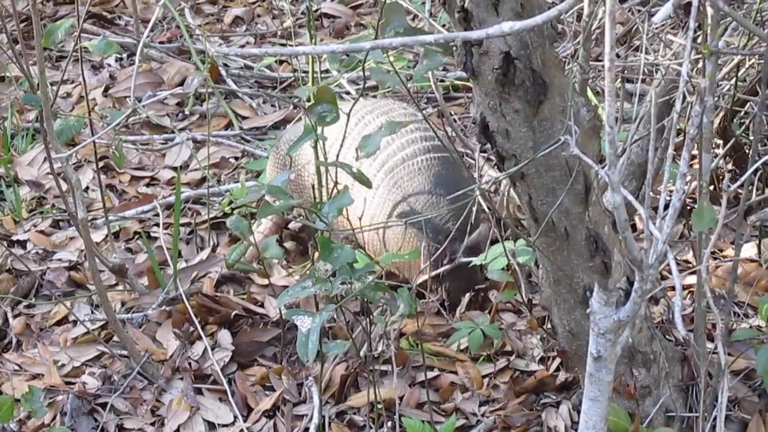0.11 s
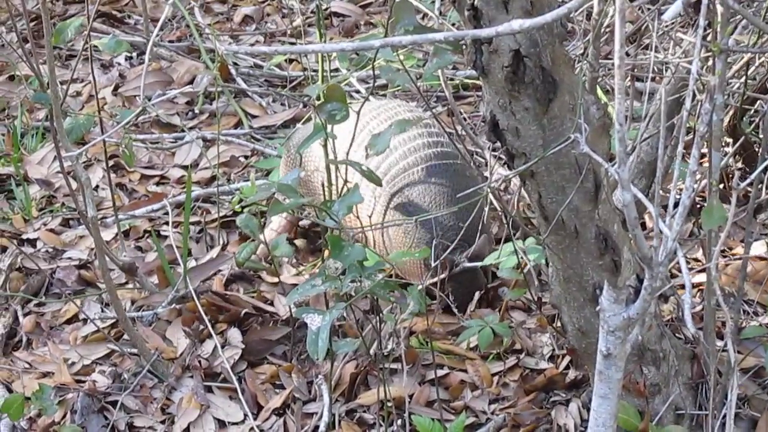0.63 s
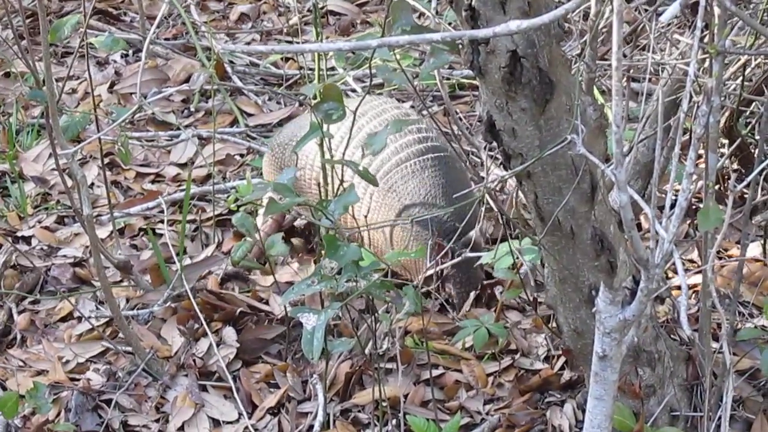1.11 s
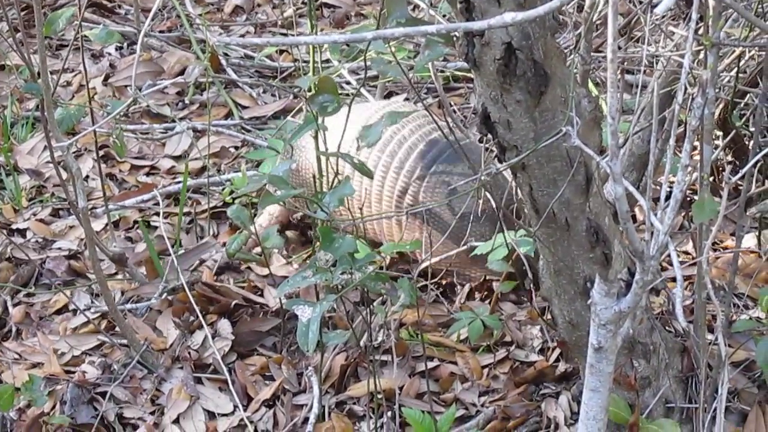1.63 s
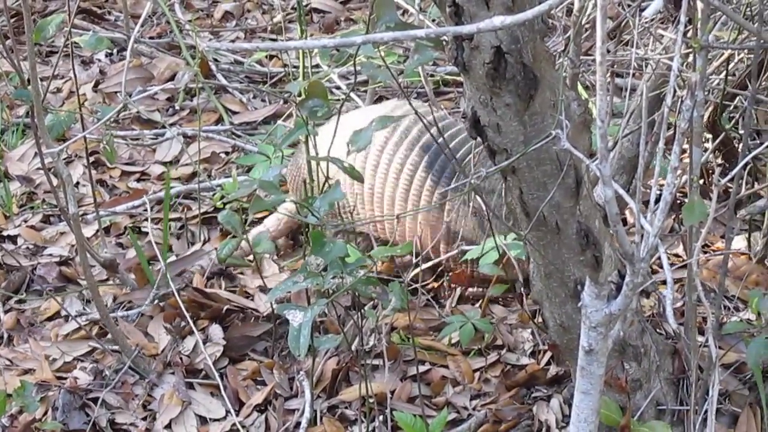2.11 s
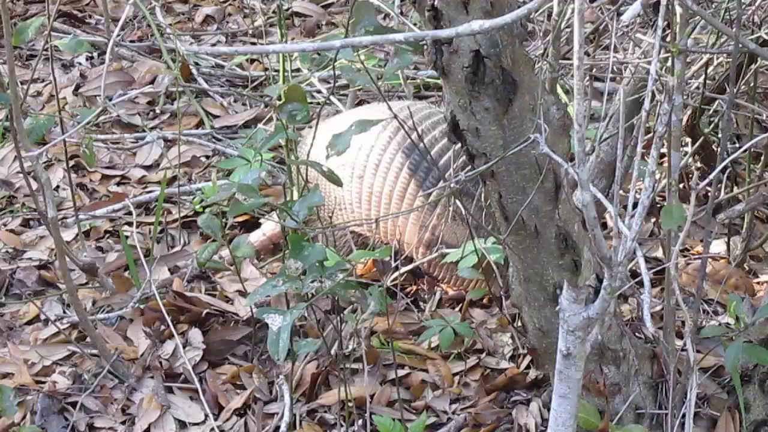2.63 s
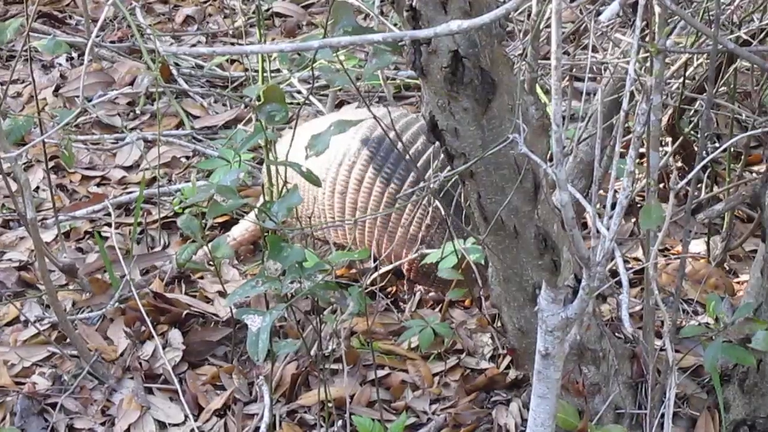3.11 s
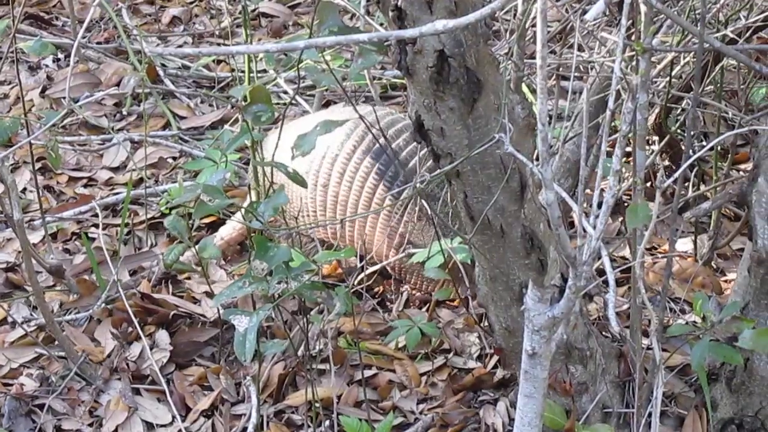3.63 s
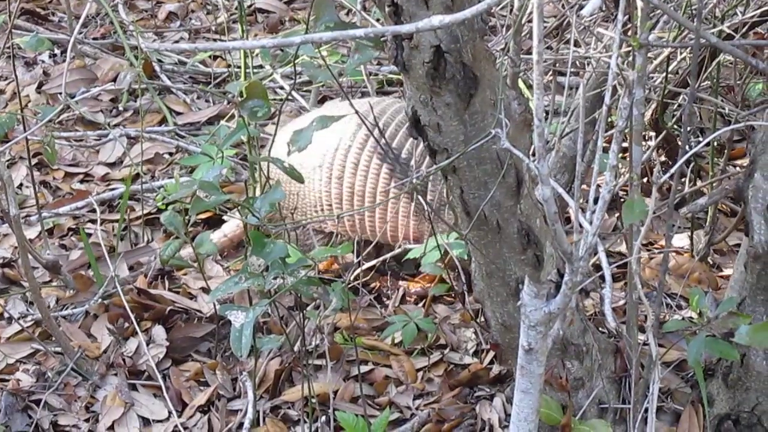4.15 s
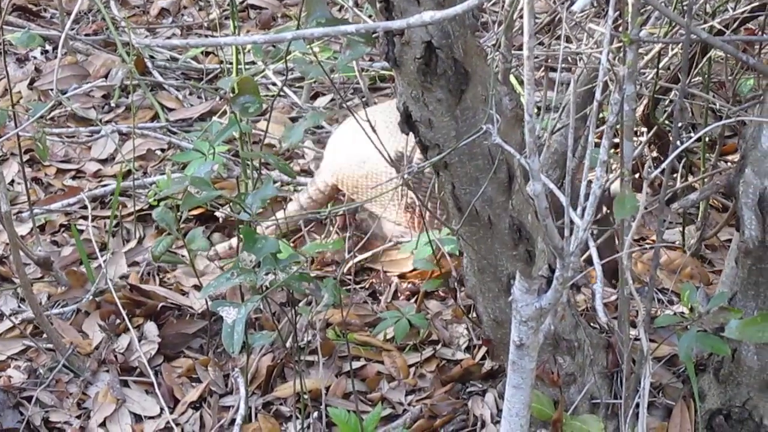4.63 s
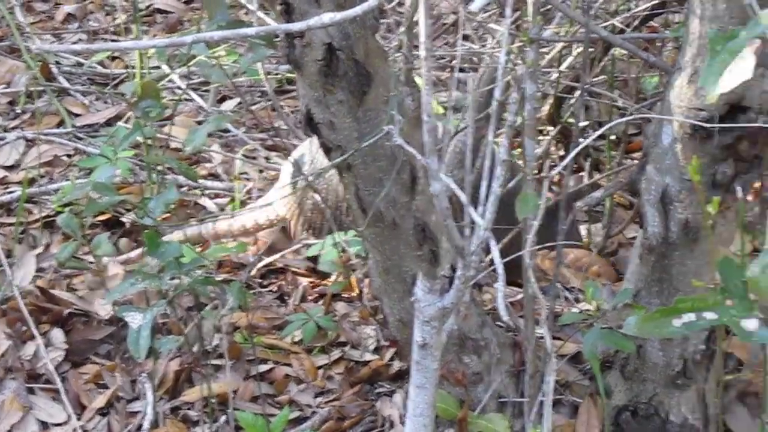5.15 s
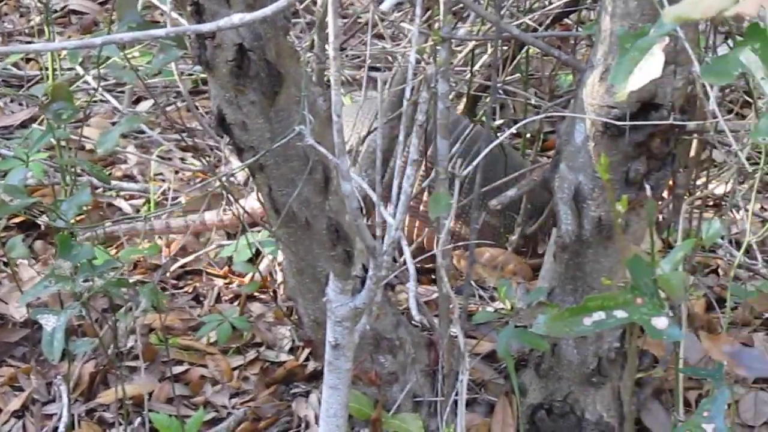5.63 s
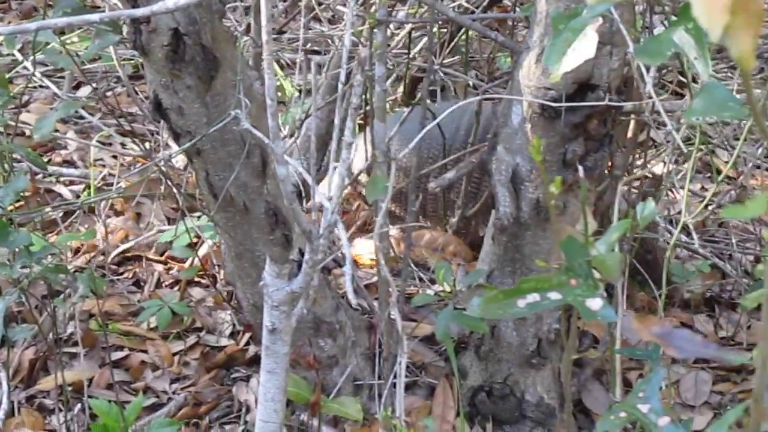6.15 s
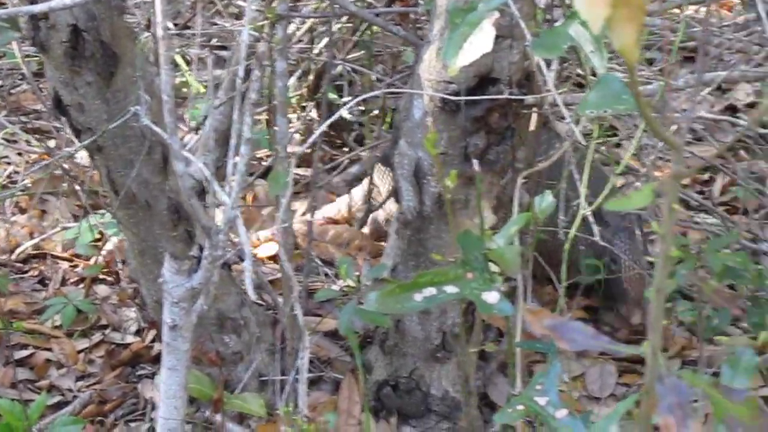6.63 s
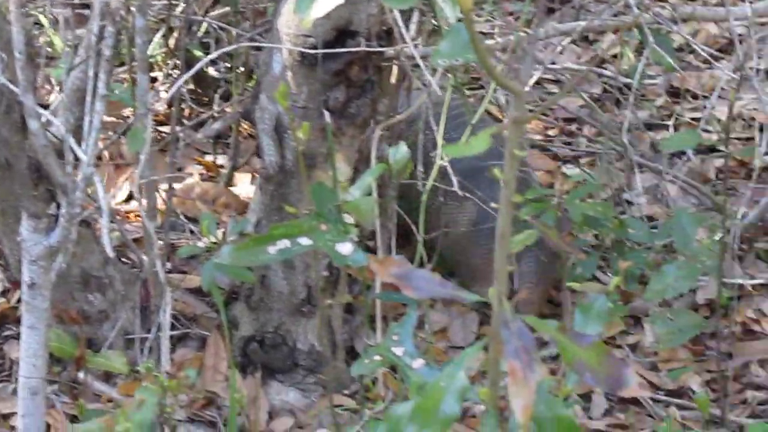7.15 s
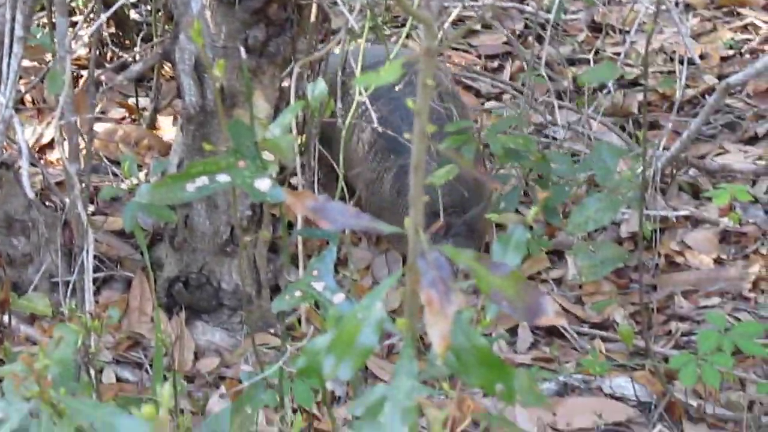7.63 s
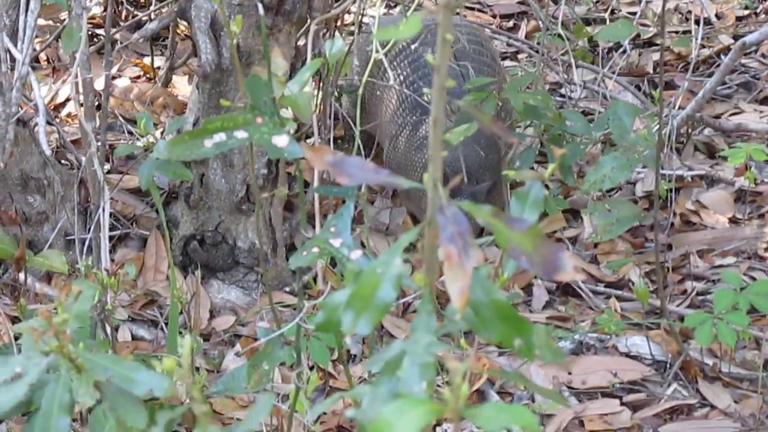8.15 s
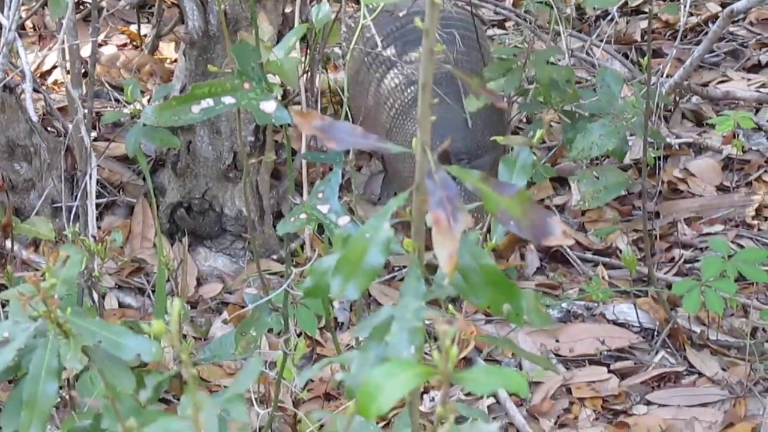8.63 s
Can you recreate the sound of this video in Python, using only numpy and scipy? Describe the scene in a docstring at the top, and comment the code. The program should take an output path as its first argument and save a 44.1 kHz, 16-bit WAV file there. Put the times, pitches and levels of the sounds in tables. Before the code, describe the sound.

Dry leaf litter crackles in uneven bursts, sparse then busy with sharp snaps, above a quiet woodland hush, insect hiss and far-off traffic rumble.

```python
"""In a thicket, an armadillo noses and shuffles through dry leaves a few metres from a small stereo camera.
The rustle is a swarm of tiny noise flashes that swells with each push; single leaves and twigs snap
as short noise bursts with a ring and a thud. Insects far off are a band of noise, with one nearer
throbbing singer; distant traffic is a wavering sine drone, a growl and a rumble, under the hush of the wood."""
import sys
import numpy as np
from scipy import signal
from scipy.fft import rfft, irfft, next_fast_len
from scipy.io import wavfile
from scipy.ndimage import uniform_filter1d

SR = 44100
rng = np.random.default_rng(int(sys.argv[2]) if len(sys.argv) > 2 else 0)


def store_pcm(level_fs):
    """Save levels as 16-bit WAV."""
    pcm = np.round(np.clip(level_fs, -1, 1) * 32767).astype(np.int16)
    wavfile.write(sys.argv[1], SR, np.atleast_2d(pcm).T)


def gain_from_decibels(decibels):
    """Convert decibel values to linear amplitude factors."""
    exponent = np.asarray(decibels, float) / 20
    return 10 ** exponent


N = 386793
T = np.arange(N) / SR
RUSTLE_PIVOT_DB = -53.5  # rustle level around which the dull crunch and the lesser cracks scale


def shape(x, points):
    """Filter by (Hz, dB) points joined on a log-frequency axis."""
    hz, db = np.transpose(points)
    size = next_fast_len(x.shape[-1])
    f = np.maximum(np.fft.rfftfreq(size, 1 / SR), 1)
    gain_db = np.interp(np.log(f), np.log(np.maximum(hz, 1)), db)
    return irfft(rfft(x, size) * gain_from_decibels(gain_db), size)[..., :x.shape[-1]]


def band(x, lo_hz, hi_hz):
    """Butterworth band-pass."""
    return signal.sosfilt(signal.butter(3, [lo_hz, min(hi_hz, .48 * SR)], "band", fs=SR, output="sos"), x)


def unit(x):
    """Scale to rms 1."""
    return x / np.sqrt(np.mean(x ** 2))


def curves(table):
    """Columns of a table after its time column, one value per sample."""
    s, *columns = np.transpose(table)
    return [np.interp(T, s, c) for c in columns]


def walk(rate_hz):
    """Random levels held for 1 / rate_hz seconds, smoothed twice, scaled to rms 1."""
    hold = int(SR / rate_hz)
    steps = np.repeat(rng.standard_normal(N // 200), hold)[:N]
    return unit(uniform_filter1d(uniform_filter1d(steps, hold), hold))


def fade(x, t60_s):
    """Each impulse dies away by 60 dB in t60_s."""
    return signal.lfilter([1], [1, -np.exp(-np.log(1000) / (t60_s * SR))], x)


def wide(points):
    """Stereo noise: one shared part, and an opposed side part coloured by points."""
    mid, side = rng.standard_normal((2, N))
    return mid + shape(side, points) * np.array([[1], [-1]])


# each shove of snout or foot: peak_s, rustle_db, fall_ms (6 dB down on either side), crisp_db (over rustle)
SHOVES = [(0.034, -55.5, 39, 8), (0.165, -58, 31, 3), (0.442, -61, 23, -1.0), (0.537, -65, 52, 5),
          (0.692, -68, 99, 4), (1.0, -61.5, 97, 4), (1.123, -60, 34, 7), (1.273, -67, 30, 13),
          (1.349, -61.9, 24, 10), (1.505, -54, 20, 3.5), (1.611, -53, 33, 4.3), (1.69, -58, 50, 5),
          (1.857, -48.5, 42, 5.5), (2.013, -46.0, 44, 4.5), (2.094, -47.5, 32, 5), (2.266, -47, 65, 3.5),
          (2.486, -53, 18, 3.1), (2.588, -54.5, 27, 3), (2.757, -72, 15, -7), (2.889, -61.5, 81, 4.5),
          (3.047, -66, 23, 7), (3.288, -61.5, 82, 1.5), (3.44, -64, 74, 2), (3.577, -65, 19, 3),
          (3.634, -65, 28, 1), (3.854, -67, 36, 5), (4.158, -57.5, 107, 5), (4.302, -49.5, 16.5, 4.5),
          (4.428, -54, 96, 8), (4.679, -49, 112, 6.5), (4.696, -46.5, 33, 3), (4.787, -60, 14, 4),
          (5.083, -54, 17, -2.6), (5.237, -53.5, 21, 5), (5.34, -60, 33, 3), (5.448, -48, 138, 4),
          (5.62, -54, 35, 1), (5.767, -49, 138, 3.7), (5.858, -49, 87, 7.5), (6.011, -55, 35, 3.3),
          (6.15, -50.5, 17, 6), (6.233, -45, 19, 7.5), (6.263, -48, 151, 3), (6.45, -44, 18, 3),
          (6.55, -52.5, 50, -6), (6.671, -44, 17, -5), (6.805, -39.5, 63, 2.2), (6.94, -46, 62, 3.5),
          (7.033, -41.5, 39, 1.5), (7.123, -42, 23, 3), (7.23, -56, 28, 1), (7.282, -42, 38, 0),
          (7.35, -50, 27, 4), (7.41, -46.0, 66, 3.5), (7.49, -51, 36, 0), (7.556, -51.5, 34, 7.5),
          (7.647, -52, 22, 6), (7.7, -56, 30, 2), (7.811, -52, 39, 4.5), (7.964, -48.5, 40, 4.5),
          (8.06, -55, 30, 1), (8.135, -55.5, 25, 5.5), (8.21, -53.5, 18, 6), (8.39, -51, 20, 3),
          (8.457, -45.5, 76, 3.5), (8.59, -54, 50, 8.5), (8.715, -44.5, 35, 7)]
# restless stirring between shoves: time_s, rustle_db
RESTLESS = [(0, -57), (0.3, -66), (0.8, -75.5), (1.6, -61), (2.4, -56), (3.2, -72), (4, -73), (4.8, -56.5),
            (5.6, -59.5), (6.1, -57.5), (6.5, -48), (7.3, -49.5), (8.25, -61), (8.77, -48)]


def stirring():
    """Rustle level and its crisp share in dB: bell-shaped shoves add their power to the restless stirring."""
    stir_crisp_db = 4
    power = gain_from_decibels(curves(RESTLESS)[0]) ** 2
    crisp = power * gain_from_decibels(stir_crisp_db) ** 2
    for peak_s, db, fall_ms, crisp_db in SHOVES:
        drop_db = 6 * np.minimum((1000 * (T - peak_s) / fall_ms) ** 2, 20)
        shove = gain_from_decibels(db - drop_db) ** 2
        power = power + shove
        crisp = crisp + shove * gain_from_decibels(crisp_db) ** 2
    return 10 * np.log10(power), 10 * np.log10(crisp / power)


# colour of dry leaves at the microphone: freq_hz, density_db (per Hz, relative)
LEAF_COLOUR = [(240, -30), (400, -7.5), (760, -3), (1050, -11), (1410, -4.5), (1810, -10), (2780, -2.5),
               (5720, 0.5), (7670, -5.5), (8410, -6.5), (10100, -10.5), (12300, -8.5), (14000, -8.5),
               (16500, 2)]
# stereo width of the direct cracks: freq_hz, side_db (over the shared part)
DIRECT_WIDTH = [(300, -1), (1000, -22), (3000, -15.5), (7000, -7.5), (15000, -0.5)]
# stereo width of the scattered tail: freq_hz, side_db (over the shared part)
SCATTER_WIDTH = [(500, -29), (3000, -14), (15000, -15.5)]


def rustle():
    """Countless cracks of very uneven size, each a flash of noise; they come in clumps."""
    cracks_per_s, crack_t60_s = 1200, 0.006
    scatter_db, scatter_t60_s = -4, 0.078
    mid_db, crisp_db = stirring()
    # the dull crunch grows less than the rustle
    dull_db = -5.5 - 0.29 * (mid_db - RUSTLE_PIVOT_DB)
    count = int(cracks_per_s * N / SR)
    when = rng.integers(0, N, count)
    size = np.minimum(rng.exponential(size=(count, 4)), 5)
    clump_db = 1.16 * walk(45)
    direct = shape(wide(DIRECT_WIDTH), LEAF_COLOUR)
    # stems and ground scatter every crack into a short tail
    scatter = shape(wide(SCATTER_WIDTH), LEAF_COLOUR)
    layers = [(450, 2040, mid_db + dull_db, 2.6),
              (2260, 5940, mid_db, 1.3),
              (7540, 13670, mid_db + crisp_db, 1.3)]
    out = 0
    for k, (lo_hz, hi_hz, db, spread_db) in enumerate(layers):
        # a crack has one size for all bands and a colour of its own
        crack_db = spread_db * (0.7 * size[:, 0] + 0.41 * size[:, k + 1])
        power = np.bincount(when, gain_from_decibels(crack_db) ** 2, N) * gain_from_decibels(2 * clump_db)
        # halved times, because the root of the power falls half as fast
        flash = unit(direct * np.sqrt(fade(power, crack_t60_s / 2)))
        tail = unit(scatter * np.sqrt(fade(power, scatter_t60_s / 2)))
        out = out + gain_from_decibels(db) * unit(band(flash + gain_from_decibels(scatter_db) * tail, lo_hz, hi_hz))
    return out


def small_snaps():
    """Lesser cracks at chance moments, stronger when the rustle is, each with its own ring and colour."""
    per_s = 10
    count = int(per_s * N / SR)
    even, bell = rng.random((count, 2)), rng.standard_normal((count, 3))
    start_s = even[:, 0] * N / SR
    over_pivot_db = np.interp(start_s, T, stirring()[0]) - RUSTLE_PIVOT_DB
    level_db = -39 + 0.6 * over_pivot_db + 2.5 * bell[:, 0]
    ring_hz = 8400 - 4500 * even[:, 1] ** 1.5
    thud_db = -21 + 6 * bell[:, 1]
    crisp_db = -1 + 5 * bell[:, 2]
    return list(zip(start_s, level_db, ring_hz, thud_db, crisp_db))


# cracks that stand out: start_s, level_db (peak of the splintering), ring_hz, thud_db, crisp_db (both relative)
BIG_SNAPS = [(0.014, -36.5, 1500, 6, -3), (0.0449, -39, 5560, -22, 7.5), (0.4277, -39, 4870, -15, -9),
             (0.4908, -32.5, 6800, -17, -1), (0.502, -40, 6290, -20, -3), (0.5252, -25, 6430, -24, 1.5),
             (0.562, -40, 8270, -25, 2), (0.5713, -34, 8200, -23, 0), (0.6236, -37, 6980, -27, -10),
             (0.698, -25, 8100, -37, -1.5), (0.9408, -38, 8230, -26, 1), (0.9658, -32, 8310, -8, -3),
             (1.0363, -32, 7060, -19, 2), (1.1083, -19, 5800, -39, 3.5), (1.1279, -33, 5940, -35, -8),
             (1.2217, -43, 6160, -7.5, 4), (1.3482, -39, 6000, -29, -5), (1.4242, -42, 7670, -16, 8),
             (1.4392, -39, 4740, -14.5, -12), (1.502, -36, 5156, -30, -3), (1.8047, -34, 2930, -22, 0),
             (1.866, -30, 6460, -13, 6), (1.981, -25.5, 5640, -17, -1), (1.9949, -22, 7500, -27.5, 0),
             (2.039, -28, 3060, -20, -3), (2.0624, -33, 7410, -30, -11), (2.268, -26, 7500, -21, 2),
             (2.5596, -37, 5560, -13, 2), (2.5837, -29, 5660, -23, -5), (2.5963, -30, 3720, -23, -4),
             (2.777, -44, 7073, -13, 12), (2.9165, -36, 3010, -22, -5), (3.0352, -30.5, 8100, -20, -6),
             (3.2563, -41, 2010, -11, -2), (3.398, -38, 4250, -10.5, -11.5), (3.865, -41, 5280, -18, 0),
             (4.0375, -36, 1520, -10, -2), (4.3767, -27.5, 5980, -17, -2), (4.426, -29, 6930, -30, -9.5),
             (4.7855, -33, 4950, -25, -2), (4.7951, -27, 5940, -37, 2.5), (4.8423, -33, 8350, -21, -10),
             (4.9007, -31, 7620, -28, -8.5), (5.0809, -31, 3380, -15, -11), (5.2269, -33.5, 6140, -10, 7),
             (5.3975, -29, 3300, -11, -7), (5.5267, -28, 8200, -16, 6), (5.5407, -35.5, 7410, -18, 11),
             (5.5927, -32, 5730, -32, 1), (5.611, -27.5, 7240, -13, -1), (5.6637, -32, 6510, -9, -10),
             (5.682, -36, 5600, -20, 11), (5.722, -26, 7970, -35, 5.5), (5.7886, -21, 7240, -31, 1.5),
             (5.847, -25, 7490, -24, 4), (5.8538, -25, 6200, -14, -5), (5.9042, -30.5, 5940, -12, 4),
             (6.0128, -31.5, 5560, -29, 0), (6.129, -40, 6300, -31, 9), (6.1476, -29, 5000, -5.5, 0),
             (6.1699, -30, 8400, -23, 6), (6.1916, -26, 5760, -39, 5), (6.2455, -21.5, 7540, -37, 4.5),
             (6.3357, -28, 5500, -14, -10), (6.4469, -25.5, 4030, -11, -12),
             (6.5594, -21.5, 4300, -20, -21), (6.6906, -29, 6160, -15, -1), (6.742, -20, 4130, -18, 0),
             (6.7951, -6, 8170, -20, -2), (6.8805, -23, 4160, -16, 3), (6.9199, -24, 7110, -21, 1),
             (6.9485, -27, 6720, -17, -4), (7.0111, -27, 6930, -23, 0), (7.057, -26, 8230, -20.5, 8),
             (7.1015, -27, 6760, -23, 6), (7.1384, -23, 4910, -22, 0), (7.2074, -29, 5430, -31, 9.5),
             (7.2197, -26.5, 4690, -14, 10), (7.251, -20, 6400, -28, 3), (7.353, -25, 7020, -29, 5),
             (7.367, -24, 7300, -26, -2), (7.3958, -12.5, 8440, -21, -3), (7.401, -20, 6330, -23, -4),
             (7.4246, -27, 4820, -12.5, 5), (7.546, -23, 5770, -37, 1), (7.567, -31, 3720, -18, 2),
             (7.616, -22, 7410, -15, -4), (7.6465, -27.5, 6540, -17, 1), (7.7237, -29, 6030, -34, -1),
             (7.83, -24.5, 8400, -17.5, -8.5), (7.966, -26.5, 7110, -30, 4), (8.1382, -33.5, 6420, -21, -3),
             (8.2923, -36, 6990, -20, 5), (8.4464, -19.5, 7700, -22, -3.5), (8.458, -19.5, 6700, -24, -13),
             (8.6271, -27.5, 6270, -20, -10.5), (8.699, -20, 7360, -20, -12), (8.754, -13.5, 6550, -24, -2)]
# colour of a crisp tick: freq_hz, gain_db
TICK_COLOUR = [(8400, 2.5), (10200, -1), (12300, 2.5), (16000, -11.5)]


def snaps():
    """A leaf or twig breaks: a sharp tick, splintering with a short ring, a thud, a faint scattered tail."""
    length = 3000
    out, t = np.zeros((2, N + length)), np.arange(length) / SR
    for start_s, level_db, ring_hz, thud_db, crisp_db in list(BIG_SNAPS) + small_snaps():
        noise = rng.standard_normal((5, length))
        pan_db = 0.5 * noise[0, 0]  # left over right
        # thuddier cracks die slower
        t60_s = 0.012 * np.exp(0.025 * (thud_db + 21))
        attack = np.minimum(t / 0.00027, 1)
        burst = (noise[0] + 0.38 * noise[1:3]) * attack * gain_from_decibels(-60 * t / t60_s)
        # the fibre lets go in one click, which holds every frequency
        burst[:, 12] += 4.0
        burst = burst + noise[3:] * gain_from_decibels(-26 - 60 * t / 0.073)  # scattered tail
        thud = band(burst, 476, 1420)
        splinter = shape(band(burst, 1240, 10030), [(1200, -9.5), (2800, -4), (5700, 0)])
        body = splinter + band(burst, 0.88 * ring_hz, 1.044 * ring_hz)
        tick = shape(band(burst, 8360, 17400), TICK_COLOUR)
        snap = 0
        for db, part in [(thud_db, thud), (0, body), (crisp_db, tick)]:
            snap = snap + gain_from_decibels(db) * part / np.abs(part.mean(axis=0)).max()
        i = int(start_s * SR)
        out[:, i:i + length] += snap * gain_from_decibels(level_db + np.array([[pan_db], [-pan_db]]) / 2)
    return out[:, :N]


# tilt of the leaf sound between the two ports: freq_hz, left_minus_right_db
PORT_TILT = [(60, 0.5), (110, 1.0), (200, -4), (380, -2), (700, -0.5), (1290, -2), (2380, -3.5),
             (4400, -1.5), (8120, 0.0), (15000, 4)]


def leaves():
    """Rustle and snaps; the two ports hear the front with slightly different colours."""
    both = rustle() + snaps()
    left = shape(both[0], [(hz, db / 2) for hz, db in PORT_TILT])
    right = shape(both[1], [(hz, -db / 2) for hz, db in PORT_TILT])
    return np.array([left, right])


# swell of the insect chorus: time_s, level_db (before its flutter)
CHORUS_LEVEL = [(0, -59), (.2, -56.5), (1, -58), (2.2, -54), (3.2, -56.5), (3.6, -55.5), (4.1, -56.5),
                (5, -53), (6, -53), (7, -54), (8, -55.5), (8.77, -47)]
# colour of the chorus: freq_hz, gain_db (relative)
CHORUS_COLOUR = [(5400, -20), (6200, -4), (6600, 0.5), (7600, -0.5), (7900, -7), (8500, -6), (9300, -34)]


def insects():
    """Many singers blur into a hiss; for a moment a nearer one, pulsed noise, throbs through it."""
    throb_hz, throb_at_s = 48.05, 3.773
    peak_s, peak_db, rise_db_per_s, fall_db_per_s = 3.75, -59.5, 30, 31
    colour = [(4000, -62.5)] + list(CHORUS_COLOUR) + [(11000, -64.5)]
    chorus = shape(wide([(5000, -0.89), (9000, 1.6)]), colour)
    chorus_db = curves(CHORUS_LEVEL)[0] + 1.0 * walk(7)
    throb = np.exp(2.0 * np.cos(2 * np.pi * throb_hz * (T - throb_at_s)))
    near = band(wide([(5000, 3.0), (9000, -11)]) * throb, 6970, 7800)
    near_db = peak_db - np.maximum(rise_db_per_s * (peak_s - T), fall_db_per_s * (T - peak_s))
    return gain_from_decibels(chorus_db) * unit(chorus) + gain_from_decibels(near_db) * unit(near)


# traffic levels: time_s, drone_db (before its waver), growl_db, rumble_db (before its surge)
ROAD_LEVELS = [(0, -54, -65, -52), (.8, -53, -65, -52.5), (1.2, -61, -65, -52.5), (1.45, -62, -68, -54),
               (1.73, -50.5, -63, -51.5), (1.98, -62, -56, -54.5), (2.12, -49, -64, -52.5),
               (2.4, -53.5, -61, -54.5), (3.1, -59.5, -66.5, -52), (3.5, -52, -58.5, -53.5),
               (4.6, -53.5, -65, -51.5), (5.5, -55, -64.5, -51.5), (6.1, -61, -59, -53.5),
               (6.5, -58, -59, -50.5), (7, -57, -66, -49.5), (7.5, -56, -64, -49.5), (8, -51, -58, -48.5),
               (8.77, -63, -62, -51.5)]
# engine drone: time_s, pitch_hz (before its waver)
DRONE_PITCH = [(0, 56.8), (.5, 55.3), (2, 54.47), (4, 55.1), (4.9, 59), (5.9, 54.1), (6.5, 65.8),
               (7.2, 57.77), (7.8, 62.26), (8.77, 59.5)]
# colour of the rumble and of the hush of the wood: freq_hz, density_db (per Hz, relative)
WOOD_COLOUR = [(20, -18), (35, -3.5), (55, 2.5), (100, -4.5), (180, -6), (300, -12), (600, -17),
               (1100, -21), (1600, -30), (3000, -32), (6000, -37.5), (10500, -46), (13500, -35.5),
               (16000, -37)]
# stereo width of rumble and hush: freq_hz, side_db (over the shared part)
WOOD_WIDTH = [(30, -6), (60, -2.5), (130, -4), (300, 0), (700, -3), (2000, 0), (15000, 2)]


def traffic():
    """A wavering engine drone and a blurred growl inside the rumble; above it the steady hush of the wood."""
    drone_db, growl_db, rumble_db = curves(ROAD_LEVELS)
    pitch_hz = curves(DRONE_PITCH)[0] * (1 + 0.026 * walk(6.5))
    turns = np.cumsum(pitch_hz) / SR
    waver_db = 2.5 * walk(8)
    drone = np.sin(2 * np.pi * turns) * gain_from_decibels(drone_db + waver_db) * np.sqrt(2)
    growl = gain_from_decibels(growl_db) * unit(band(rng.standard_normal((2, N)), 148.0, 180.2))
    air = shape(wide(WOOD_WIDTH), WOOD_COLOUR)
    # the rumble level counts from the band where it is felt most evenly: 84.5 to 276 Hz at rms 1
    air = air / np.sqrt(np.mean(band(air, 84.5, 276) ** 2))
    low = signal.sosfilt(signal.butter(2, 350, fs=SR, output="sos"), air)
    surge_db = 1.0 * walk(4)
    rumble = gain_from_decibels(rumble_db + surge_db) * low
    hush = gain_from_decibels(-53.0) * (air - low)
    return drone + growl + rumble + hush


def scene():
    """Leaves in the thicket over insects and traffic."""
    return leaves() + insects() + traffic()


def band_limit(x):
    """A steep low-pass at the top of the band."""
    return signal.sosfilt(signal.butter(12, 17010, fs=SR, output="sos"), x)


def record(dry):
    """The camera notches out one narrow line and cuts the top steeply."""
    notch_hz, notch_q, top_hz = 7875, 80, 15760
    notched = signal.lfilter(*signal.iirnotch(notch_hz, notch_q, SR), dry)
    cut = signal.sosfilt(signal.ellip(12, .3, 70, top_hz, fs=SR, output="sos"), notched)
    return band_limit(cut)


dry = scene()
out = record(dry)
store_pcm(out)
```